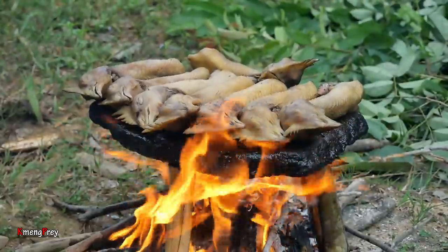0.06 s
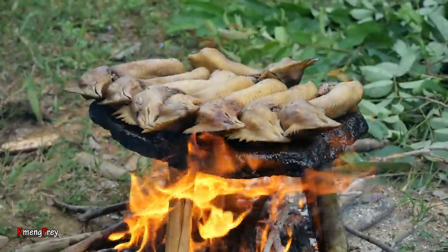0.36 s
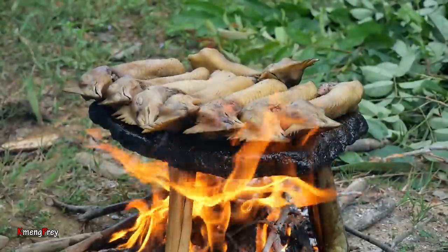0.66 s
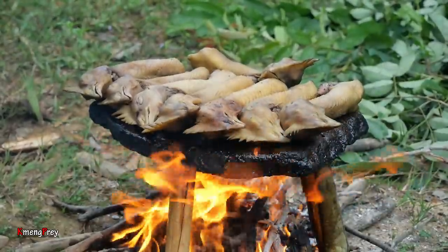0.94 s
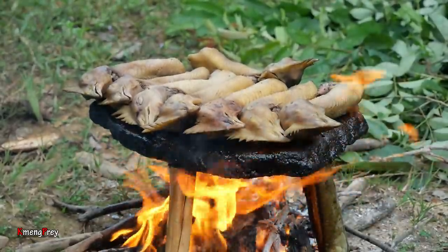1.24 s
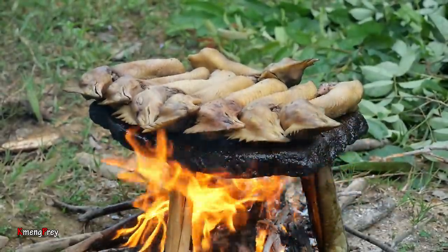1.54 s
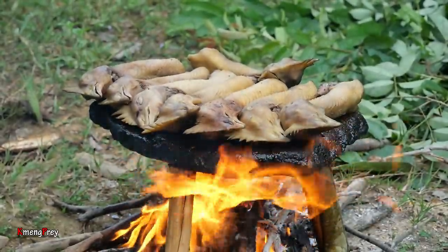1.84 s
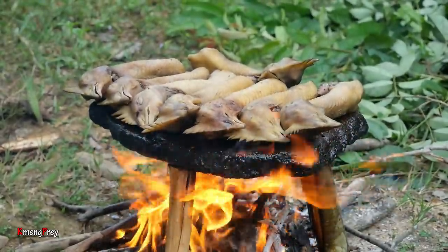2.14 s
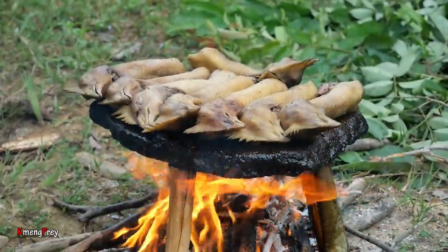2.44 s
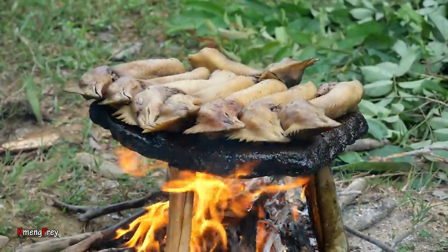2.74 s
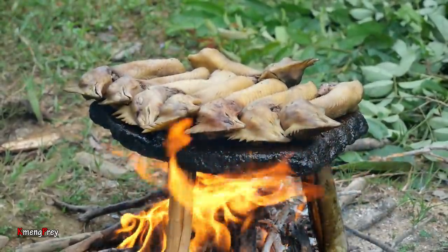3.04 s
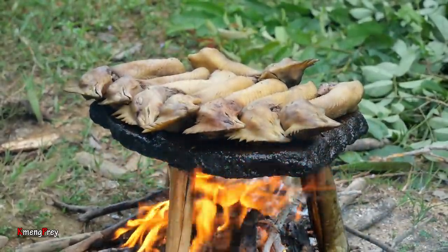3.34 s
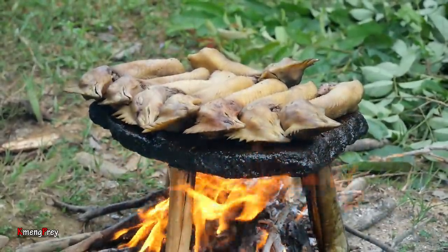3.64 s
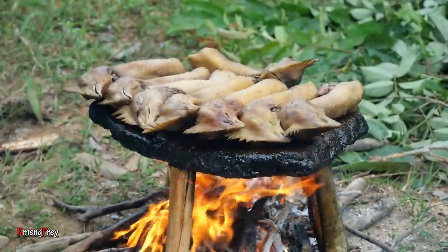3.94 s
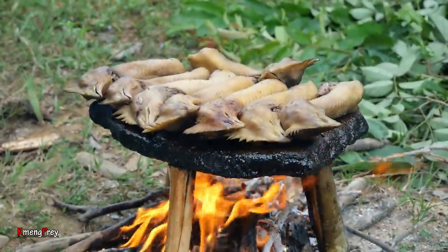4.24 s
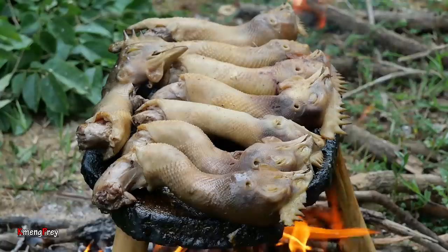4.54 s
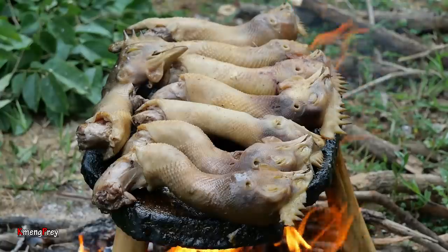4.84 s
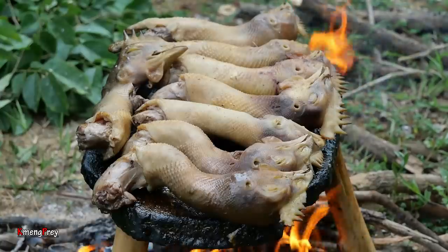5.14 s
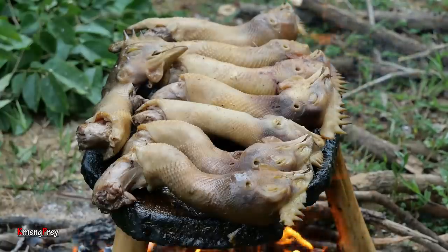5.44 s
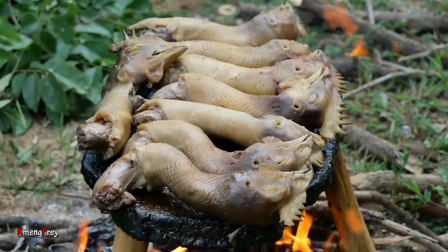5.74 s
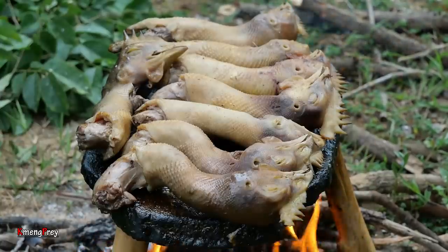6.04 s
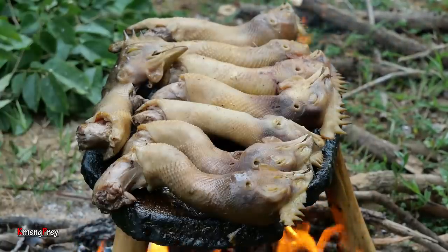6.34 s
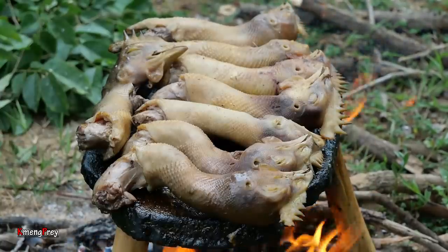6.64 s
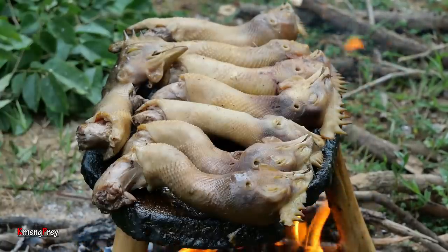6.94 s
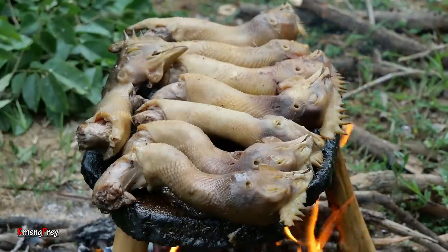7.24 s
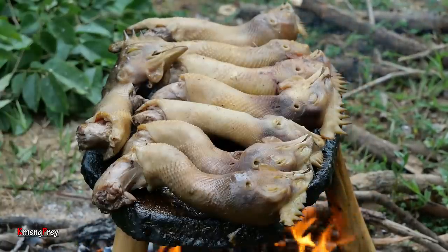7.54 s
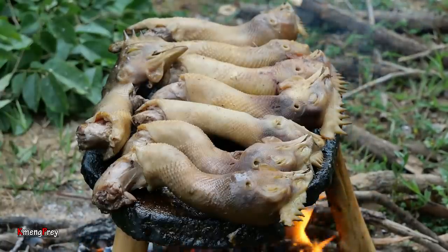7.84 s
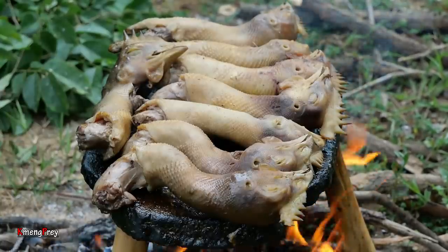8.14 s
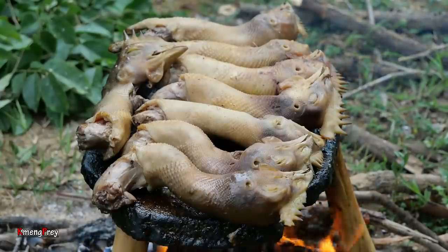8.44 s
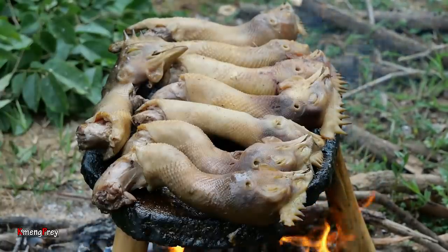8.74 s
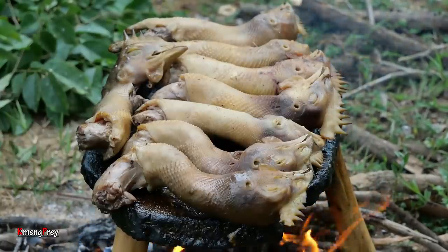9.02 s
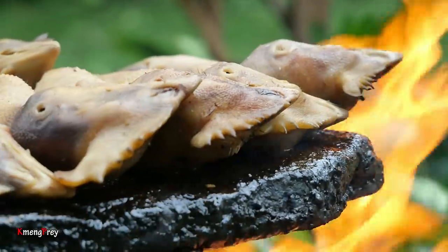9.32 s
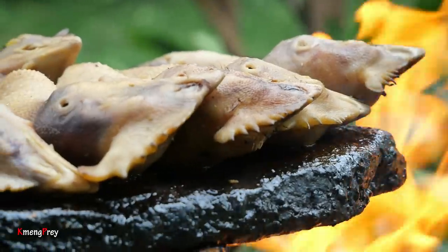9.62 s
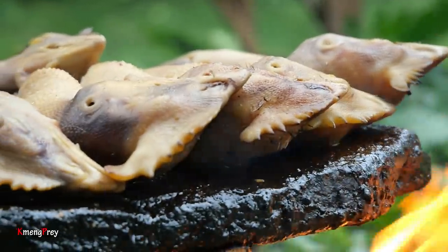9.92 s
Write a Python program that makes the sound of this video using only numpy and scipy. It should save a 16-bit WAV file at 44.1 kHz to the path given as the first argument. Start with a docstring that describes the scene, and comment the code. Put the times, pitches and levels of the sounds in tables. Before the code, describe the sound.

From the start a wooden pestle pounds paste in a clay mortar, loud and centred, at about four and a half blows a second. Hard blows give a short, hollow clay ring; softer ones land with a dull thud and a slight moist crunch. Underneath, a wood fire hisses faintly with occasional pops. Distant birds add very faint high trills and a few whistles until about 4.7 seconds. From roughly 4.3 to 5.1 seconds the pounding eases into soft taps and small scrapes along the bowl. At about 4.6 seconds the fire becomes nearer, with a low rush of flame, denser sizzling and a cluster of sharp pops. Firm knocks return around 5.2 seconds and keep the same pace until the end at 10 seconds, with the fire crackling quietly below them. The place is open air, with a slight short echo from trees.

```python
"""Outdoors among trees, a wooden pestle pounds paste in a clay mortar, about 4.5 blows a second.
Hard blows ring the clay; others land softly in the paste. Under a griddle stone a wood fire
hisses and pops, much nearer from 4.56 s on. Small birds call far off, and the trees scatter
the knocks back. Loud knocks overload the recorder: its gain ducks and the peaks clip."""
import sys
import numpy as np
from scipy import signal
from scipy.fft import rfft, irfft, next_fast_len
from scipy.io import wavfile
from scipy.ndimage import uniform_filter1d, map_coordinates

SR = 44100
rng = np.random.default_rng(int(sys.argv[2]) if len(sys.argv) > 2 else 0)


def unload_audio(sound):
    """Save the sound as a 16-bit wav file, at the path given as the first command line argument."""
    columns = np.transpose(np.atleast_2d(sound))
    # keep every value between -1 and 1, then stretch to whole-number steps
    steps = np.round(np.clip(columns, -1, 1) * 32767)
    wavfile.write(sys.argv[1], SR, steps.astype(np.int16))


N = 440118
MOVE_S = 4.56  # the microphone is close to the fire from here on

# pestle blows: (time [s], force [dB], hardness [0 paste .. 1 bare clay], height [0 bottom .. 1 wall])
BLOWS = [(0.0348, -8.5, 0.44, .35), (0.2549, -29, 0.18, .05), (0.3016, -38.5, .1, 0.33),
         (0.463, -15, 0.27, .03), (0.6543, -10, .6, .03), (0.8588, -10.5, .95, .03),
         (1.0944, -10, 0.81, 0.19), (1.3203, -11, 0.72, 0.37), (1.5417, -11.5, 0.58, 0.29),
         (1.7556, -13, 0.5, 0.44), (1.969, -14, 0.58, 0.035), (2.1707, -9.5, 0.57, 0.55),
         (2.393, -13.5, 0.77, 0.056), (2.6128, -14.5, 0.85, .03), (2.8285, -13.5, .7, .03),
         (3.0491, -21.5, 0.36, .03), (3.254, -13, 0.68, .03), (3.4793, -16, 0.67, 0.026),
         (3.6987, -13, 0.68, 0.15), (3.9238, -15.5, 0.68, .03), (4.151, -16, 0.71, .05),
         (4.361, -23, 0.045, 0.11), (4.571, -33.5, 0.25, .03), (4.7835, -30, 0.18, 0.29),
         (4.8089, -25.5, 0.3, 0.56), (5.0227, -25, .2, .2), (5.2191, -11.5, 0.41, 0.96),
         (5.3956, -20.5, .05, .65), (5.4098, -29, 0.17, .1), (5.6447, -14, 0.67, 0.95),
         (5.8702, -11, 0.66, 0.66), (6.1068, -12.5, 0.64, 0.52), (6.3448, -15, 0.65, .05),
         (6.5528, -14, 1, 0.53), (6.7744, -15, 0.68, 0.091), (7.009, -14, 0.73, 0.26),
         (7.2508, -15, 0.94, 0.23), (7.4637, -13, 0.79, 0.18), (7.6787, -17, 0.73, .03),
         (7.9141, -16.5, 0.84, 0.46), (8.1216, -16, 0.68, .05), (8.349, -13, 0.67, 0.99),
         (8.5687, -14.5, 0.77, 0.63), (8.8142, -14.5, 0.77, 0.59), (9.055, -15.5, 0.58, 0.3),
         (9.273, -8.5, 0.83, 0.39), (9.4771, -25.5, .45, .03), (9.4895, -18.5, 0.044, .03),
         (9.7075, -12, 0.59, 0.21), (9.9313, -14.5, 0.38, .03)]
# ringing modes of mortar and pestle: (frequency [Hz], level [dB], t60 [s])
MORTAR_MODES = [(189, -6.5, 0.039), (427, 0, 0.0097), (487.8, 11.5, 0.038), (570, 2, 0.029),
                (817, 9.5, 0.014), (1175.5, 9, 0.039), (1323, 11, 0.027), (1435, 8, 0.015),
                (1570, 8, 0.029), (1699, 11, 0.032), (1860, 12.5, 0.022), (2024, 8, 0.023),
                (2378, 9.5, 0.021), (2580, 3, 0.029), (2777, 3.5, 0.02), (3060, -0.5, 0.041)]
# tonal zones of the mortar, in the order bowl, low wall, mid wall, rim: (centre [Hz])
ZONE_HZ = [620, 860, 1250, 1600]
# each zone's answer to a blow: (cushioned level [dB], change on bare clay [dB], change up the wall [dB])
ZONE_RESPONSE = [(0.5, 0, -5.5), (-21, 21.5, -3.5), (-25, 16.5, 18.5), (-23.5, 24, -3)]
# coarse paste falls back under the pestle: (time [s])
FRESH_PASTE_S = [0.0, 5.5, 9.2]
# pestle drags: (time [s], length [s], level [dB])
SCUFFS = [(4.579, 0.052, -37.5), (4.777, 0.032, -28), (4.852, 0.044, -35.5), (5.005, 0.019, -26),
          (5.398, 0.044, -32)]
# fire level curves, a far list and a near list: (time [s], flame rush [dB], relative sizzle [dB])
FIRE_LEVELS = [
    [(0.0, -56.5, -56), (0.58, -55.5, -53.5), (0.94, -57.5, -56), (4.27, -66.5, -62.5), (4.52, -63, -59.5)],
    [(4.66, -50.5, -52.5), (4.9, -51.5, -45), (5.8, -54, -51), (9.21, -59, -54.5), (9.98, -53, -48.5)],
]
# tone of the flames, the far sizzle and the near sizzle: (frequency [Hz], relative level [dB])
FLAME_EQ = [(25, -8), (70, -8), (150, 0), (300, -3), (500, -2.5), (850, -8.5), (1300, -9), (2200, -14),
            (5000, -29)]
SIZZLE_FAR_EQ = [(600, -33), (1500, -1.5), (2800, 2.5), (3700, -4), (4800, 3), (5700, -5), (6700, 2.5),
                 (8000, -7), (12000, -10.5), (15500, -30.5)]
SIZZLE_NEAR_EQ = [(600, -31), (1500, -11), (2200, -6.5), (2850, 1), (3600, -5), (5000, -3.5), (6800, -6.5),
                  (8000, -11.5), (12000, -12.5), (15500, -25)]
# featured pops of the fire: (time [s], relative level [dB], brightness [dB])
LOUD_POPS = [(0.6003, -28.5, 7.5), (0.7351, -25.5, 1), (1.0485, -37, -11), (1.5163, -35, -3),
             (2.105, -36, -15), (3.7211, -36, -15), (4.678, -22.5, -15), (4.8869, -29.5, -1),
             (4.9034, -25.5, 16), (5.0038, -21.5, -5.5), (5.0724, -30.5, -17), (5.0861, -27.5, -4),
             (5.186, -28, -19), (5.6025, -32.5, 21), (5.744, -33, 10), (5.9889, -30, -11),
             (6.2398, -32.5, -4), (6.2638, -27.5, -1), (6.4795, -32.5, -3), (7.2063, -31.5, 7),
             (7.845, -33.5, -2), (8.271, -32, -15), (8.4428, -31, -18), (8.7252, -35, -2),
             (8.9567, -30, -28), (9.4186, -27.5, 17), (9.8167, -25, 18)]
# swells of sizzle: (time [s], length [s], peak level [dB])
SPURTS = [(1.357, 0.25, -49), (1.85, 0.065, -43.5), (2.719, 0.12, -50), (4.815, 0.062, -45)]
# tone of the echo off the trees: (frequency [Hz], relative level [dB])
TREES_EQ = [(100, -16), (300, -10), (520, 0), (900, -4.5), (1250, -0.5), (1700, 0.5), (2600, 3.5),
            (8000, -2)]
# decay of that echo: (frequency [Hz], t60 [s])
TREES_T60 = [(200, 0.73), (500, 0.28), (1600, 0.31), (6000, 0.14)]
# a small bird's runs of chirps: (start [s], end [s], level [dB])
TRILLS = [(0.39, .66, -60.5), (1.76, 1.96, -66.5), (3.048, 3.24, -56), (4.227, 4.52, -60)]
# far whistles: (time [s], length [s], start pitch [Hz], middle pitch [Hz], end pitch [Hz], level [dB])
WHISTLES = [(2.4, .1, 3980, 4150, 4650, -57), (3.064, 0.42, 1300, 1416, 1400, -63),
            (3.735, 0.11, 4010, 4070, 4670, -68), (4.398, 0.31, 1430, 1384, 1360, -62)]
# stereo width of the ambience: (frequency [Hz], side relative to mid [dB])
STEREO_WIDTH = [(30, -12), (150, -13.5), (2000, -21), (10000, -14)]


def pestle(thud_s=0.0013, crunch_fade_db_per_s=2.5, thud_fade_db_per_s=4):
    """Each blow layers clay ring, paste crunch and ground thud; the last two fade as the paste thins."""
    track, t = np.zeros(N), np.arange(SR // 20) / SR
    thud = t / thud_s * np.exp(-t / thud_s)
    for s, force_db, hardness, height in BLOWS:
        zone_db = np.dot(ZONE_RESPONSE, [1, hardness, height])
        pounded_s = s - max(fresh for fresh in FRESH_PASTE_S if fresh <= s)
        crunch_db = -25 + 0.69 * force_db - crunch_fade_db_per_s * pounded_s
        thud_db = -19 + force_db - thud_fade_db_per_s * pounded_s
        add(track, s, amp(force_db) * knock(zone_db))
        add(track, s - 1 / 40, amp(crunch_db) * crunch(force_db + zone_db[-1]))  # peaks on the hit
        add(track, s, -amp(thud_db) * thud)
    return track


def knock(zone_db, contact_s=0.00023, scatter_db=2, detune=0.011, radiation_hz=290):
    """One blow rings the mortar's modes; where the pestle lands sets their balance."""
    t = np.arange(SR // 12) / SR
    hz, db, t60 = np.transpose(MORTAR_MODES)[:, :, None]
    level_jitter, pitch_jitter, phase_jitter = rng.standard_normal((3, len(MORTAR_MODES), 1))
    on_wall = hz > (ZONE_HZ[0] + ZONE_HZ[1]) / 2
    db = db + np.interp(hz, ZONE_HZ, zone_db) + scatter_db * level_jitter * on_wall
    phase = np.where(on_wall, phase_jitter, np.pi)  # the wall swings loosely against the bowl
    partials = np.sin(2 * np.pi * hz * (1 + detune * pitch_jitter) * t + phase)
    ring = np.sum(amp(db - 60 * t / t60) * partials, axis=0)
    push = np.exp(-(t[:SR // 300] / (contact_s / 2) - 2) ** 2)  # wood on clay: short and rounded
    low_cut = signal.butter(2, radiation_hz, "high", fs=SR)  # a small pot radiates little bass
    return signal.lfilter(*low_cut, signal.fftconvolve(ring, push / push.sum()))


def crunch(rim_db):
    """Crushed paste: a snap when the blow reaches the clay, a longer squelch when it is cushioned."""
    t = np.arange(-SR // 40, SR // 20) / SR
    rise_s = np.interp(rim_db, [-36, -22], [.004, .0003])
    fall_s = np.interp(rim_db, [-36, -22], [.008, .0032])
    envelope = np.exp(np.minimum(t / rise_s, -t / fall_s))
    eq = [(300, -1.5), (1200, 7.5), (3000, 1.5), (5000, -3), (7500, -12), (11000, -19), (16000, -29)]
    return coloured(grains(len(t), grit=0.55) * envelope, eq)


def scuffs():
    """The pestle drags along the bowl with a hollow scrape."""
    eq = [(100, -19), (200, 1.5), (350, -6), (590, 9.5), (800, -13), (1050, -9), (1350, -7),
          (2500, -11.5), (9000, -32)]
    return gritty_swells(SCUFFS, eq, grit=0.5)


def fire(far_trim_db=1, near_trim_db=2):
    """Flames rush, sap sizzles and crackles; close up the crackle is denser and sharper."""
    t = np.arange(N) / SR
    s, rush_db, sizzle_db = np.vstack(FIRE_LEVELS).T
    flame_gain = amp(np.interp(t, s, rush_db) + 3.6 * wobble(13))
    flame = flame_gain * coloured(rng.standard_normal(N), FLAME_EQ)
    far_ticks = crackle(per_s=110, spread_db=5.5, top_db=17)
    near_ticks = crackle(per_s=200, spread_db=9, top_db=20)
    far = amp(far_trim_db) * coloured(rng.standard_normal(N) + far_ticks, SIZZLE_FAR_EQ)
    near = amp(near_trim_db) * coloured(rng.standard_normal(N) + near_ticks, SIZZLE_NEAR_EQ)
    sizzle_gain = amp(np.interp(t, s, sizzle_db) + 2.5 * wobble(14))
    return flame + sizzle_gain * np.where(t < MOVE_S, far, near)


def crackle(per_s, spread_db, top_db):
    """Sap ticks at random, sized against a millisecond of hiss at rms 1; the louder, the rarer."""
    when, size = rng.random((int(per_s * N / SR), 2)).T
    db = -spread_db * np.log(1 - size * (1 - np.exp(-top_db / spread_db)))
    energy = np.bincount((when * N).astype(int), amp(db) ** 2 * SR / 1000, N)
    return np.sqrt(smoothed(energy, lag_s=0.0002)) * rng.standard_normal(N)


def pops(trim_db=-6.5, mic_resonance_hz=2850, mic_decay_s=0.00051, snap_s=0.00017, tail_db=-22):
    """Fire pops: short snaps, coloured by a brief microphone resonance near 2.9 kHz."""
    track, t = np.zeros(N), np.arange(SR // 80) / SR
    snap_envelope = np.exp(-t / snap_s) + amp(tail_db) * np.exp(-t / 0.00294)
    snap_eq = [(500, -10), (2500, 1), (6000, 6), (12000, -9), (16000, -16)]
    for s, db, bright_db in LOUD_POPS + small_pops():
        hz = mic_resonance_hz * np.exp(0.024 * rng.standard_normal())
        mic_resonance = np.cos(2 * np.pi * hz * t) * np.exp(-t / mic_decay_s)
        snap = coloured(rng.standard_normal(len(t)) * snap_envelope, snap_eq)
        add(track, s, amp(db + trim_db) * unit(unit(mic_resonance) + amp(bright_db) * snap))
    return track


def small_pops(count=44):
    """Cues for filler pops at random moments, louder where the fire sizzles harder."""
    s, _, sizzle_db = np.vstack(FIRE_LEVELS).T
    times = rng.random(count) * N / SR
    size, brightness = rng.standard_normal((count, 2)).T
    db = np.interp(times, s, sizzle_db) + 16.5 + 3 * size
    bright_db = -7.5 + 9 * brightness
    return list(zip(times, db, bright_db))


def spurts():
    """The sizzle flares in brief, gritty swells."""
    eq = [(1000, -11), (2800, -0.5), (6000, -3), (11000, -12.5), (16000, -19)]
    return gritty_swells(SPURTS, eq, grit=1.9)


def trees(x, gap_s=0.016, build_s=0.013):
    """Foliage scatters each knock back, swelling after a short gap; each band dies at its own speed."""
    wet = np.zeros(N)
    edges = [round(blow[0] * SR) for blow in BLOWS] + [N]
    for start, end in zip(edges, edges[1:]):
        hz, t, noise = signal.stft(rng.standard_normal(SR // 2), SR, nperseg=256)
        swell = np.clip((t - gap_s) / build_s, .15, 1)
        band_db = along(TREES_EQ, hz)[:, None] - 60 * t / along(TREES_T60, hz)[:, None]
        _, tail = signal.istft(noise * swell * amp(band_db), SR, nperseg=256)
        add(wet, start / SR, signal.fftconvolve(x[start:end], tail / np.linalg.norm(tail)))
    return wet


def birds(chirp_step_s=0.049):
    """Far birds: runs of high falling chirps and a few slow whistles."""
    track = np.zeros(N)
    for start, end, db in TRILLS:
        for s in np.arange(start, end, chirp_step_s):
            gain = amp(db + rng.normal(0, 1.7))
            add(track, s, gain * bird_note(0.052, [6950, 6500, 6200], waver=0.012))
    for s, length_s, *pitches_hz, db in WHISTLES:
        add(track, s, amp(db) * bird_note(length_s, pitches_hz, waver=0.0044))
    return track


def bird_note(length_s, pitches_hz, waver):
    """A soft-edged, wavering whistle gliding through three pitches."""
    progress = np.linspace(0, 1, int(length_s * SR))
    glide_hz = np.polyval(np.polyfit([0, .5, 1], pitches_hz, 2), progress)
    flutter = map_coordinates(rng.standard_normal(200), [progress * length_s * 250], mode="mirror")
    hz = glide_hz * (1 + waver * flutter)
    envelope = np.sqrt(np.abs(np.sin(np.pi * progress)))
    return envelope * np.sin(2 * np.pi * np.cumsum(hz) / SR)


def reflected(x, delay_s, gain):
    """Add one dull reflection from a surface close by."""
    return filtered(x, lambda hz: 1 + gain * np.exp(-2j * np.pi * hz * delay_s) / (1 + 1j * hz / 2500))


def spread(x):
    """Two close microphone ports: nearly mono, with a touch of width."""
    scatter = rng.standard_normal(96)
    diffuse = signal.fftconvolve(x, scatter / np.linalg.norm(scatter), "same")
    side = filtered(diffuse, lambda hz: amp(along(STEREO_WIDTH, hz)))
    return np.array([x + side, x - side])


def gritty_swells(cues, eq, grit):
    """Grainy noise faded in and out at each cue."""
    track = np.zeros(N)
    for s, length_s, db in cues:
        n = int(length_s * SR)
        add(track, s, amp(db) * np.hanning(n) * coloured(grains(n, grit), eq))
    return track


def grains(n, grit):
    """Noise that gets spikier with more grit."""
    return rng.standard_normal(n) * np.exp(grit * rng.standard_normal(n))


def wobble(per_s):
    """A smooth random drift through per_s points a second."""
    return map_coordinates(rng.standard_normal(int(N * per_s / SR) + 4), [np.arange(N) * per_s / SR])


def smoothed(x, lag_s):
    """One-pole lag."""
    pole = np.exp(-1 / (lag_s * SR))
    return signal.lfilter([1 - pole], [1, -pole], x)


def coloured(x, eq):
    """Shape x with an EQ curve, at rms 1."""
    return unit(filtered(x, lambda hz: amp(along(eq, hz))))


def filtered(x, response):
    """Apply a frequency response."""
    n = x.shape[-1]
    padded = next_fast_len(n + 8192)
    return irfft(rfft(x, padded) * response(np.fft.rfftfreq(padded, 1 / SR)), padded)[..., :n]


def along(points, hz):
    """Read a curve on a log frequency axis."""
    point_hz, values = np.transpose(points)
    return np.interp(np.log(hz + 1), np.log(point_hz + 1), values)


def amp(db):
    """Decibels to gain."""
    return 10 ** (np.asarray(db) / 20)


def unit(x):
    """Scale to rms 1."""
    return x / np.sqrt(np.mean(x ** 2) + 1e-20)


def add(track, s, sound):
    """Mix a sound into the track at time s."""
    start = max(0, round(s * SR))
    part = sound[:max(0, N - start)]
    track[start:start + len(part)] += part


def scene(trees_db=-32):
    """The mortar sits dead centre; its nearest reflection changes with the microphone's place."""
    blows = pestle() + scuffs()
    first_place = reflected(blows, delay_s=0.0065, gain=0.077)
    second_place = reflected(blows, delay_s=0.006226, gain=0.16)
    knocks = np.where(np.arange(N) / SR < MOVE_S, first_place, second_place)
    ambience = amp(trees_db) * trees(blows) + fire() + spurts() + pops() + birds()
    return knocks + spread(ambience)


def record(dry, threshold_db=-6, release_db_per_s=32, attack_s=0.0025, top_hz=15800):
    """Gain control ducks on loud knocks and creeps back; overshoots soft-clip; then a steep high cut."""
    power = np.abs(uniform_filter1d(dry.mean(axis=0) ** 2, SR // 500))
    over_db = np.maximum(0, 10 * np.log10(power + 1e-12) - threshold_db)
    recovery_db = release_db_per_s * np.arange(N) / SR
    held_db = np.maximum.accumulate(over_db + recovery_db) - recovery_db
    ducked = dry * amp(-smoothed(held_db, attack_s))
    clipped = ducked / (1 + np.abs(ducked) ** 6) ** (1 / 6)
    return filtered(clipped, lambda hz: 1 / (1 + (hz / top_hz) ** 80))


dry = scene()
out = record(dry)
unload_audio(out)
```